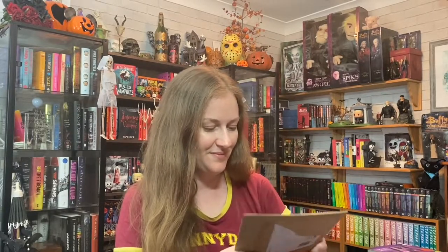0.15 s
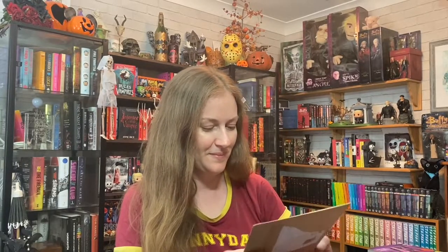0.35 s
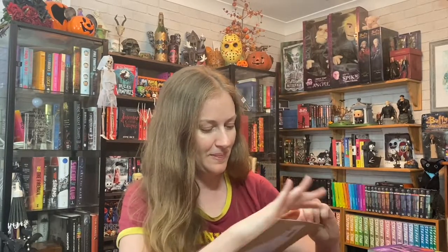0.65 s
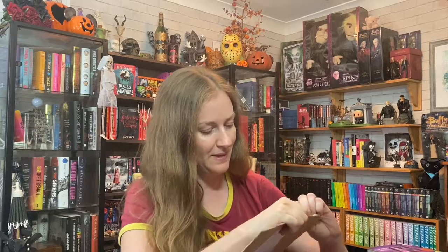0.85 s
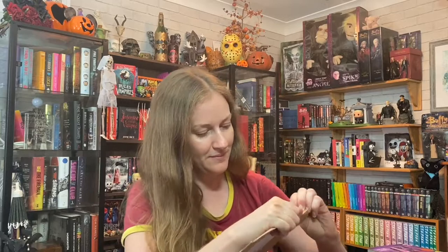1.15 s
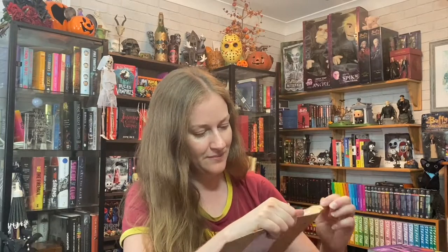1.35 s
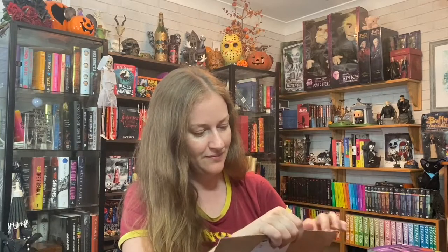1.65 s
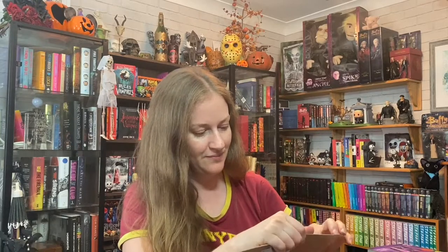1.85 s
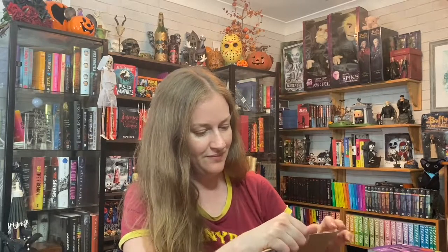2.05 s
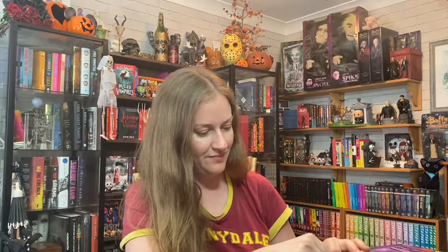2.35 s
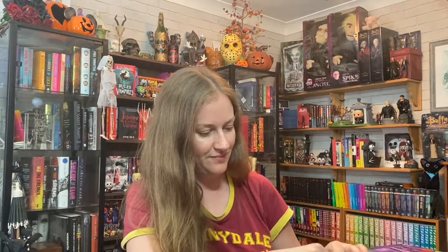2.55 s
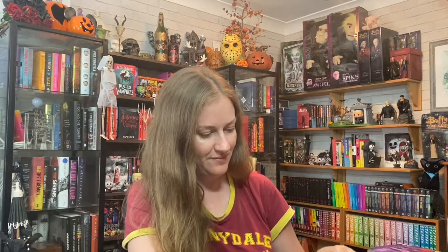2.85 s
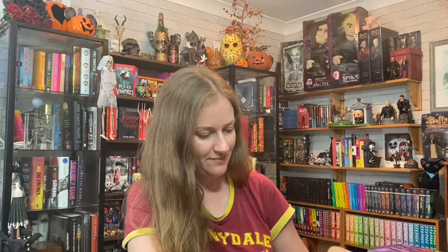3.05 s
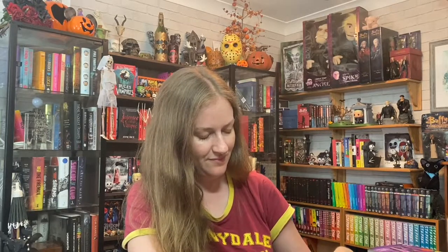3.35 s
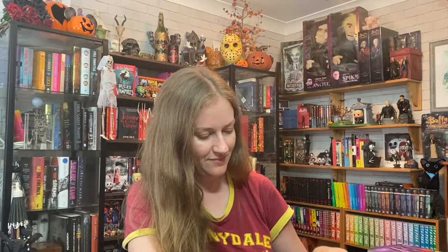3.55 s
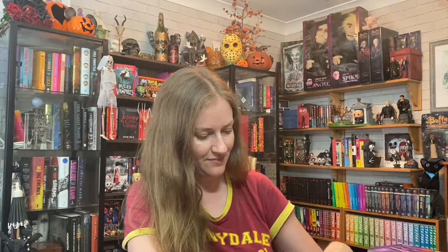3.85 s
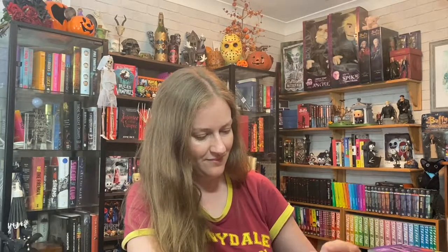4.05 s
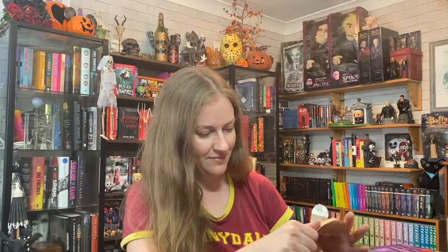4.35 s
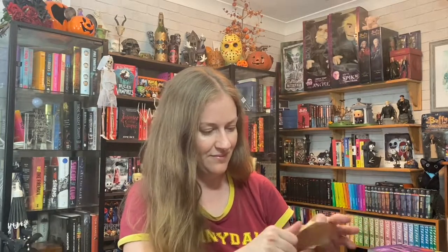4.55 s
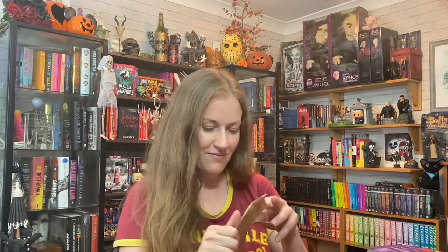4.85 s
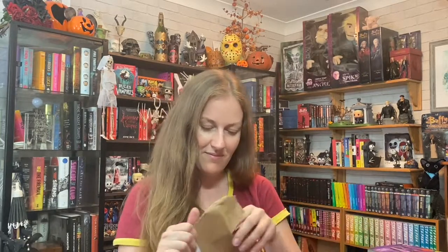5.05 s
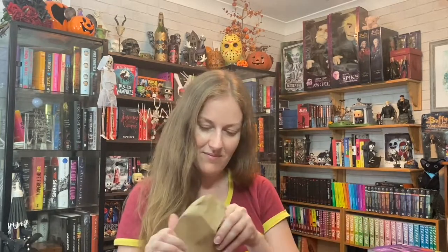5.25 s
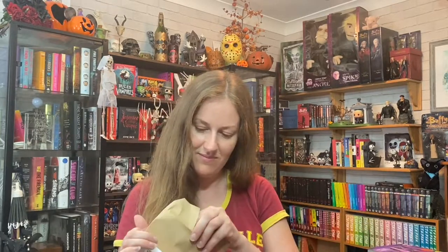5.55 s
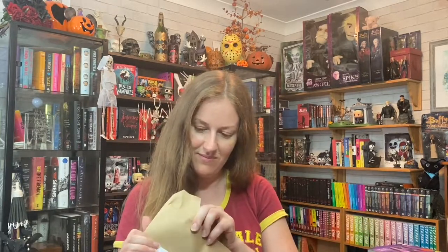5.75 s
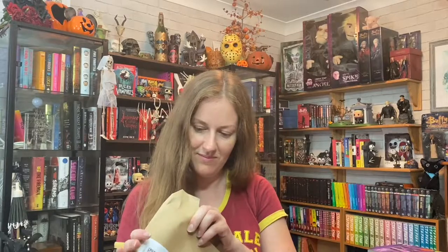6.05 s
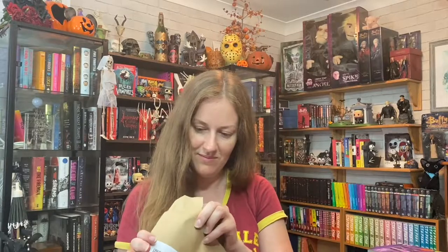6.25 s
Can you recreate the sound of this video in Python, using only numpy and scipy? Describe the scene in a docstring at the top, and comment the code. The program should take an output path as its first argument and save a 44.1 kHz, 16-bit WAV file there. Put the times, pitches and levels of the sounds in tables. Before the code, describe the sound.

A stiff card envelope is opened by hand. A few faint creases, then a hard snapping rip and a softer, slightly longer tear right after. Mostly near-silent rubbing and scattered clicks until a scrape and a low knock; then busier crinkling, low puffs of bending card and muffled bumps as a packet is lifted. Near microphone, short room tail, very low rumble and hiss.

```python
"""Ripping open a cardboard mailer

In a small room lined with shelves, two pulls on the tear strip break card fibres in bursts of clicks.
Hands stroke the card (filtered click trains), and creases snap as a paper packet is drawn out and lifted.
Low gusts come from bending card, and soft bumps ring at sinking pitches.
Scattered echoes and a short tail surround it all in two channels, above a faint noise floor."""
import sys
import numpy as np
from scipy import signal
from scipy.fft import rfft, irfft
from scipy.io import wavfile

SR = 44100
rng = np.random.default_rng(int(sys.argv[2]) if len(sys.argv) > 2 else 0)


def transcribe(u):
    """Save the signal u as a 16-bit wav file named by the first command-line argument.

    u: samples, shape (n,) or (channels, n), limited to [-1, 1]; the rate is SR.
    q: integer samples, one column per channel.
    """
    v = np.clip(np.atleast_2d(u).T, -1, 1)
    q = np.round(v * 32767).astype(np.int16)
    wavfile.write(sys.argv[1], SR, q)


N = 282681


def tear():
    """Fracture noise: fibres break in quick bunches, hiss by themselves and excite the modes of the taut card."""
    # Pulls on the tear strip, the first of which catches once. Each row: time of full speed in seconds,
    # attack in seconds, length in seconds, level in dB, card level relative to the fibres in dB.
    pulls = [(0.938, 0.0012, 0.018, -29.5, 2.5), (0.98, 0.0017, 0.01, -37, -9.5),
             (1.116, 0.0077, 0.11, -39, -4.5)]
    # Spectrum of the breaking fibres. Each row: frequency in Hz, relative level in dB.
    fibre_spectrum = [(200, -17.5), (800, -0.5), (2000, -2), (3200, 4.5), (5800, 5), (8000, -2),
                      (11000, -2.5), (15000, -2)]
    # Response of the card to the breaks. Each row: frequency in Hz, relative level in dB.
    card_spectrum = [(60, 3), (150, 3.5), (320, 2), (550, -2.5), (780, -13.5), (1300, -2.5), (2500, 1.5),
                     (4000, -15.5), (8000, -2), (16000, -14)]
    # Resonances of the mailer's panels. Each row: frequency in Hz, width in Hz, gain in dB.
    panels = [(334, 83, -1), (550, 90, 5), (1340, 140, -2), (2180, 80, -1), (2200, 71, 13.5)]

    breaks = unit(snaps(rate=4000, spread_db=-3.0) * undb(2 * walk(rate=490)))
    fibres = unit(colour(breaks, fibre_spectrum))
    card = colour(breaks + snaps(rate=230, spread_db=4.0), card_spectrum)
    modes = sum(undb(db) * ring(card, hz, width_hz) for hz, width_hz, db in panels)
    card = unit(card + modes)

    out = np.zeros(N)
    for s, attack_s, length_s, db, card_db in pulls:
        share = undb(card_db)
        mixture = (fibres + share * card) / np.sqrt(1 + share ** 2)
        out += undb(db) * gesture(s, attack_s, length_s, release_db_per_s=373.5) * mixture
    return out


def crinkles(flutter_t60_s=0.034, flutter=0.25, panel_db=1, panel_q=7, order=2048, count=220):
    """Snap-through buckling: a crease flips with a click, and the sheet around it flutters as a decaying noise."""
    # Creases snapping through. Each row: start in seconds, level in dB, panel pitch in Hz,
    # body in dB, brightness in dB (the last two are weighted by the snap spectrum).
    creases = [(0.1037, -46, 2770, -3, 5), (0.1966, -36.5, 3300, -1.5, -10.5),
               (0.2813, -52.5, 2940, -17, 2), (0.552, -53, 7100, -11, 50), (0.563, -44, 7520, -9, 43.5),
               (0.6535, -53, 3040, -17, 0), (0.9383, -29.5, 1260, -7, -4.5), (0.9489, -24.5, 2220, 4, -3.5),
               (1.088, -45.5, 6000, -18, 18), (1.6127, -48.5, 520, -2, -29), (1.7917, -46, 2070, -11, -10),
               (1.8445, -49.5, 2840, 8, 0), (2.603, -46, 3020, -41, -8), (2.863, -53, 2260, -4, -5),
               (2.9282, -44.5, 2170, -9, 1), (2.944, -43, 2220, -10, -4.5), (2.965, -40, 2090, -14, -2.5),
               (2.976, -42.5, 2140, 4, 5), (3.0225, -40.5, 2200, -12, 5.5), (3.1047, -48, 7350, -21, 15),
               (3.3973, -49.5, 2100, -10, 1.5), (3.537, -52, 2170, -12, 7), (3.8026, -46, 5650, 1.5, -1.5),
               (4.446, -48.5, 1440, -12, -23), (4.4897, -52.5, 3100, -10, 16),
               (4.549, -31, 2800, -32, -2.5), (4.665, -47, 1630, -4, -7), (4.7542, -44.5, 3700, -11, -2),
               (5.016, -38.5, 1580, 14, -4), (5.0197, -33, 2270, -3, -22.5), (5.066, -44, 1350, -28, -3.5),
               (5.093, -40, 3600, -23, -3), (5.2057, -40.5, 1630, -6, -22.5), (5.2916, -48, 2800, -30, -1),
               (5.447, -43, 1180, -2.5, -36), (5.524, -50.5, 3300, 11, -8), (5.5561, -34, 1140, 2, -18.5),
               (5.685, -37.5, 1060, 7, -16), (5.753, -49, 1400, -10, -3), (5.782, -48, 2700, -13, -13),
               (5.845, -44, 2260, -31, 0), (5.8518, -24.5, 2300, -11, -10), (5.9086, -44, 2200, -8, 11),
               (5.929, -33, 2230, -7, 0), (5.9653, -38, 3270, -13, 0.5), (6.257, -40, 1800, -29, -2),
               (6.265, -37, 1460, -17, -9)]
    # Spectrum of a snap. Each row: frequency in Hz, relative level in dB, share of the body (a factor),
    # share of the brightness (a factor).
    snap_spectrum = [(60, -4.5, 0.98, 0.02), (200, -11.5, 1, 0), (520, 4, 1, 0.25),
                     (1250, 2.5, 0.066, 0.23), (3150, 8.5, 0.34, 1.02), (8200, -7, 0.17, 1.49),
                     (15000, -17, 0.61, 1.7)]

    out, t = np.zeros(N + order), np.arange(order) / SR
    chance = rng.standard_normal((len(creases), order))
    for (s, db, hz, body_db, bright_db), noise in zip(creases, chance):
        push = flutter * noise * np.exp(-np.log(1000) * t / flutter_t60_s)
        push[0] += 3  # the click itself
        outline = [(f, base + low * body_db + high * bright_db) for f, base, low, high in snap_spectrum]
        pop = colour(push, outline)
        pop = pop + undb(panel_db) * ring(pop, hz, hz / panel_q)
        # the level is that of the first few milliseconds
        onset_rms = np.sqrt(np.mean(pop[:count] ** 2))
        start = int(s * SR)
        out[start:start + order] += pop * undb(db) / onset_rms
    return out[:N]


def slide():
    """Stick-slip friction: coarse catches drive the sheet, fine ones hiss, and an occasional crease ticks."""
    # Outlines of the three bands. Each row: frequency in Hz, relative level in dB.
    body_spectrum = [(80, -7.5), (200, -5), (350, -9), (550, -5), (800, -18), (1300, -17.5), (4000, -63.5)]
    sheet_spectrum = [(250, -33.5), (600, -17), (950, 3), (1400, 5), (1800, 1), (2200, 5.5), (2700, 0.5),
                      (4000, -0.5), (6000, -18.5), (14000, -25)]
    hiss_spectrum = [(1500, -62.5), (3000, -25), (4500, 10.5), (6500, 13.5), (8500, 7.5), (12000, 4),
                     (15500, 5)]

    body_gain, sheet_gain, hiss_gain = rubbing()
    ticks = snaps(rate=32, spread_db=1.8)
    catches = snaps(rate=300, spread_db=3.2) + ticks
    grain = snaps(rate=9000, spread_db=1.8)
    body = unit(colour(catches + 0.15 * grain, body_spectrum)) * body_gain
    sheet = unit(colour(catches + 0.5 * grain, sheet_spectrum)) * sheet_gain
    hiss = unit(colour(0.2 * catches + grain, hiss_spectrum)) * hiss_gain
    pressure_db = 2.0 * walk(rate=110)
    return undb(pressure_db) * (body + sheet + hiss)


def rubbing():
    """Friction grows with speed: at each moment the strongest stroke sets the gains of body, sheet and hiss."""
    # Strokes of hand or paper over the card. Each row: time of full speed in seconds, length in seconds,
    # sheet level in dB, body relative to the sheet in dB, hiss relative to the sheet in dB.
    strokes = [(0.049, 0.073, -63.5, -11, 4.5), (0.126, 0.014, -55.5, 0, -5.5),
               (0.2, 0.075, -67.5, -0.5, -9), (0.27, 0.12, -68.5, -12, -1.5), (0.372, 0.02, -66.5, -9.5, 5),
               (0.572, 0.017, -80.5, -7, 19.5), (0.653, 0.12, -57, -3.5, -9.5),
               (0.834, 0.011, -77.5, -12, 10), (0.929, 0.0076, -56, -9, 1),
               (1.475, 0.0082, -79.5, -4, -6.5), (1.574, 0.011, -61, 2.5, -7.5),
               (1.623, 0.032, -57.5, 0, -8), (1.737, 0.025, -59, -0.5, -12), (1.835, 0.032, -60, -2, 0),
               (1.982, 0.023, -65, -12, 1), (2.066, 0.025, -58, 1.5, -9), (2.155, 0.015, -68, 4, -3),
               (2.303, 0.0065, -58, -2, -7), (2.435, 0.068, -67.5, -16.5, -5),
               (2.526, 0.0088, -61, -2, -12), (2.606, 0.027, -71.5, -0.5, 1), (2.713, 0.03, -74.5, -10, 5),
               (2.81, 0.078, -65, -13, -3), (2.944, 0.076, -55.5, -17, -2.5), (3.047, 0.15, -60.5, -21, 7),
               (3.291, 0.0076, -68, -29, 7), (3.385, 0.064, -60.5, -20, -12),
               (3.466, 0.0099, -49, -6.5, -4.5), (3.543, 0.028, -61.5, -11, -9),
               (3.693, 0.076, -66.5, -16, 4), (3.792, 0.12, -62, -14, 2.5),
               (3.919, 0.04, -55.5, -11.5, 1.5), (3.961, 0.1, -47.5, -6, 1), (4.193, 0.035, -56.5, -3, -1),
               (4.351, 0.0061, -65.5, 0, 4.5), (4.467, 0.05, -61, -7, -4), (4.552, 0.035, -49.5, -5.5, -3),
               (4.628, 0.067, -57.5, 2.5, -3), (4.746, 0.053, -61.5, -6, -0.5),
               (4.844, 0.013, -58.5, -12, -3.5), (4.895, 0.22, -66, -2.5, -7),
               (5.017, 0.085, -60.5, 3.5, -2), (5.275, 0.03, -53.5, -8.5, -6),
               (5.375, 0.012, -62.5, -5, -8), (5.44, 0.018, -62.5, 3.5, -9), (5.535, 0.032, -59, 3.5, -4.5),
               (5.667, 0.34, -56, -3.5, -9), (5.81, 0.22, -50.5, -5, -8), (6.101, 0.09, -53, -10, -7.5),
               (6.23, 0.19, -53, -9.5, -9)]
    # A faint, steady rub of the holding fingers. One row: time of full speed in seconds, length in seconds,
    # sheet level in dB, body relative to the sheet in dB, hiss relative to the sheet in dB.
    hold = (3.5, 1, -72.5, -10, 0)

    def strength(row, sag_db_per_s):
        """Band gains of one movement, proportional to its speed."""
        s, length_s, db, body_db, hiss_db = row
        speed = gesture(s, 0.014, length_s, release_db_per_s=352.5, sag_db_per_s=sag_db_per_s)
        return np.outer(undb([db + body_db, db, db + hiss_db]), speed)

    gains = strength(hold, sag_db_per_s=0)
    for row in strokes:
        gains = np.maximum(gains, strength(row, sag_db_per_s=16.5))
    return gains


def scrapes(panel_q=4):
    """Stick-slip excitation of a resonator: a finger stutters over the card and keeps one panel ringing."""
    # Fingers dragging on the card. Each row: middle in seconds, level in dB, panel pitch in Hz,
    # half length in seconds.
    drags = [(0.734, -54, 1004, 0.03), (2.31, -53, 1360, 0.011), (3.47, -51.5, 1060, 0.012),
             (4.633, -50.5, 1190, 0.016)]

    slips = snaps(rate=900, spread_db=1.5)
    out = np.zeros(N)
    for s, db, hz, half_s in drags:
        panel = ring(ring(slips, hz, hz / panel_q), hz, hz)
        out += undb(db) * swell(s, half_s) * unit(panel)
    return out


def gusts():
    """Volume displacement: the whole sheet bends and pushes air as low-frequency noise."""
    # Bends of the sheet. Each row: middle in seconds, level in dB, half length in seconds.
    bends = [(0.228, -61, 0.025), (0.716, -51, 0.033), (0.999, -49.5, 0.032), (1.833, -59.5, 0.044),
             (2.619, -58, 0.016), (3.4, -75.5, 0.45), (3.728, -65, 0.07), (4.034, -57.5, 0.047),
             (4.61, -56, 0.076), (4.903, -59.5, 0.017), (5.03, -49.5, 0.032), (5.328, -53.5, 0.018),
             (5.571, -43, 0.012), (5.7, -45, 0.013), (5.874, -51.5, 0.071), (6.076, -53.5, 0.025),
             (6.34, -57, 0.069)]

    outline = [(20, -51.5), (40, -13.0), (58, 15.5), (100, -5.5),
               (145, 10.0), (220, -12.5), (400, -20.5), (1500, -76)]
    air = unit(colour(rng.standard_normal(N), outline))
    return air * sum(undb(db) * swell(s, half_s) for s, db, half_s in bends)


def bumps(octave_drop_s=0.093):
    """Contact stiffness sets pitch: soft bumps ring briefly and sink in pitch as the contact slackens."""
    # Bumps of hand and card on the desk. Each row: start in seconds, level in dB, first pitch in Hz,
    # decay time to -60 dB in seconds.
    contacts = [(0.71, -43.5, 144.6, 0.076), (1.852, -41, 271, 0.06), (2.178, -50, 158, 0.1),
                (2.3, -47.5, 157.3, 0.1), (4.224, -31, 202.4, 0.063), (5.02, -48, 155, 0.24),
                (5.56, -43.5, 158, 0.1), (5.687, -28.5, 154, 0.03), (5.86, -23, 350, 0.023)]

    out = np.zeros(N)
    for s, db, hz, t60_s in contacts:
        t = np.maximum(np.arange(N) / SR - s, 0)
        # the pitch falls as 1 / (1 + t / octave_drop_s)
        phase = 2 * np.pi * hz * octave_drop_s * np.log1p(t / octave_drop_s)
        swing = np.sin(phase) + 0.44 * np.sin(1.3 * phase)
        onset = 1 - np.exp(-t / 0.002)
        out += undb(db) * swing * onset * np.exp(-np.log(1000) * t / t60_s)
    return out


def gesture(s, attack_s, length_s, release_db_per_s, sag_db_per_s=0):
    """Speed envelope: a movement gathers speed until s, slackens at the sag rate, then dies away."""
    t = np.arange(N) / SR - s
    fall_db = sag_db_per_s * np.maximum(t, 0) + release_db_per_s * np.maximum(t - length_s, 0)
    return np.exp(np.clip(t / attack_s, -20, 0)) * undb(-np.minimum(fall_db, 200))


def swell(s, half_s):
    """Gaussian envelope: a smooth rise and fall around a moment."""
    return np.exp(-0.5 * ((np.arange(N) / SR - s) / half_s) ** 2)


def snaps(rate, spread_db):
    """Random impulse process: tiny clicks, rate a second on average, of unequal size and either sign."""
    hit = rng.random(N) < rate / SR
    size = undb(spread_db * np.minimum(rng.exponential(size=N), 4))
    return unit(hit * size * rng.choice([-1, 1], N))


def walk(rate):
    """Slow random fluctuation: rate random points a second joined by lines, with a spread near 1."""
    points = rng.standard_normal(N // 20)
    return np.interp(np.arange(N) / SR * rate, np.arange(len(points)), points)


def room(x, near_db=2.5, own_tail_db=-10, shared_near_db=-8, shared_tail_db=-12, lifted_db=-7):
    """Decorrelation: both channels share one sound, and mid-range scatter drawn for each sets them apart."""
    # The packet is lifted to the left. Each row: time in seconds, share of the move done (a fraction).
    lift = [(4.7, 0), (5.0, 0.77)]
    scatter_t60_s = 0.032

    shared = x + undb(shared_near_db) * scatter(x, scatter_t60_s) + undb(shared_tail_db) * shelves(x)
    # scatter takes over from the direct sound in the mid-range
    shared = colour(shared, [(200, -2.5), (600, -1.0), (2000, -13), (6000, -5.5), (9500, 2), (16000, -0.5)])
    mids = cut(cut(x, 550, "high", order=1), 8750, "low", order=6)
    # above 5.3 kHz the left channel lags slightly, as the recorder makes it; the left also has less bass
    left = colour(delay(shared, 0.000188, above_hz=5300), [(500, -6.5), (1000, -1)])
    # as the packet is lifted, part of the mid-range reaches the right channel late
    lifted = curves(lift)[0]
    right = shared + undb(lifted_db) * lifted * delay(mids, 0.00045)

    def with_own_echoes(channel):
        """Add echoes drawn afresh, so that the channels are decorrelated."""
        return channel + undb(near_db) * scatter(mids, scatter_t60_s) + undb(own_tail_db) * shelves(mids)

    return np.array([with_own_echoes(left), with_own_echoes(right)])


def scatter(x, t60_s, size=3072):
    """Time-varying scattering: echoes off hands, body and desk change pattern as the paper keeps moving."""
    hop = size // 2
    t = np.arange(hop) / SR
    padded = np.pad(x, (hop, 2 * size))
    out = np.zeros(len(padded))
    # overlapping windows, each with an echo pattern of its own
    for start in range(0, N + hop, hop):
        echoes = rng.standard_normal(hop) * np.exp(-np.log(1000) * t / t60_s)
        window = padded[start:start + size] * np.hanning(size)
        heard = signal.fftconvolve(window, unit(echoes) / np.sqrt(hop))
        out[start:start + len(heard)] += heard
    return out[hop:hop + N]


def shelves(x, size=16384):
    """Diffuse reverberation: exponentially decaying noise is the short, dry tail of a room full of books."""
    t60_s, treble_t60_s = 0.16, 0.18
    t = np.arange(size) / SR
    low, high = rng.standard_normal((2, size))
    tail = cut(low, 2000, "low") * undb(-60 * t / t60_s)
    tail = tail + cut(high, 1300, "high") * undb(-60 * t / treble_t60_s)
    build_up = 1 - np.exp(-t / 0.023)
    return signal.fftconvolve(x, unit(tail * build_up) / np.sqrt(size))[:N]


def delay(x, s, above_hz=0):
    """Linear phase is pure delay: shift by any fraction of a sample, leaving what lies under above_hz in place."""
    shifted_hz = np.maximum(np.fft.rfftfreq(2 * N, 1 / SR) - above_hz, 0)
    return irfft(rfft(x, 2 * N) * np.exp(-2j * np.pi * shifted_hz * s))[:N]


def quiet(level_db=-77, apart=0.55):
    """Partly correlated noise floor: faint room rumble and microphone hiss, wider above the bass."""
    # Spectrum of the noise floor. Each row: frequency in Hz, relative level in dB.
    floor_spectrum = [(30, -11), (55, -2), (180, -12), (300, -21), (1000, -30.5), (5000, -36.5),
                      (15000, -44)]

    mid, side = (unit(colour(rng.standard_normal(N), floor_spectrum)) for _ in range(2))
    opposed = cut(side, 250, "high") * np.array([[1], [-1]])
    return undb(level_db) * (mid + apart * opposed)


def undb(db):
    """Logarithmic level: decibels to amplitude gain."""
    return 10 ** (np.asarray(db) / 20)


def unit(x):
    """Equal mean power: scale to rms 1."""
    return x / np.sqrt(np.mean(x ** 2) + 1e-30)


def curves(table):
    """Linear interpolation: each column of a table after the first, joined by straight lines in time."""
    s, *columns = np.transpose(table)
    return [np.interp(np.arange(N) / SR, s, c) for c in columns]


def colour(x, points, size=2048):
    """Minimum-phase filtering: a causal filter with the given (Hz, dB) outline, by folding the cepstrum."""
    hz, db = np.transpose(points)
    grid = np.maximum(np.fft.rfftfreq(size, 1 / SR), 1)
    log_gain = np.log(undb(np.interp(np.log(grid), np.log(hz), db)))
    cepstrum = irfft(log_gain)
    cepstrum[1:size // 2] *= 2
    cepstrum[size // 2 + 1:] = 0
    response = irfft(np.exp(rfft(cepstrum)))
    return signal.fftconvolve(x, response)[:len(x)]


def ring(x, hz, width_hz):
    """Damped oscillator: one resonance, with gain 1 at its centre."""
    return signal.lfilter(*signal.iirpeak(hz, hz / width_hz, fs=SR), x)


def cut(x, hz, kind, order=2):
    """Maximally flat filtering: Butterworth low-pass or high-pass."""
    return signal.sosfilt(signal.butter(order, min(hz, SR / 2 - 1), kind, fs=SR, output="sos"), x)


def scene():
    """Superposition: all the paper sounds add, are placed in the room by level difference, and join the noise."""
    # Place of the hands. Each row: time in seconds, left minus right in dB.
    place = [(0, 2), (0.6, 0.5), (4.6, 0.8), (5.2, 1)]

    pan_db = curves(place)[0]
    paper = tear() + crinkles() + slide() + scrapes() + gusts() + bumps()
    return room(paper) * undb(np.array([pan_db, -pan_db]) / 2) + quiet()


def record(dry):
    """Band limitation: the phone drops the deepest bass and cuts the top steeply."""
    without_bass = cut(dry, 42, "high", order=4)
    return signal.sosfilt(signal.ellip(8, 0.2, 70, 15900, fs=SR, output="sos"), without_bass)


dry = scene()
out = record(dry)
transcribe(out)
```